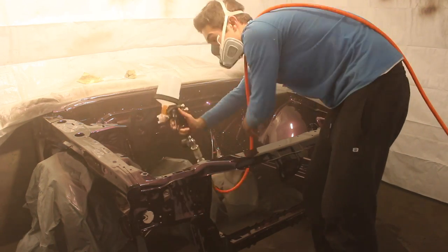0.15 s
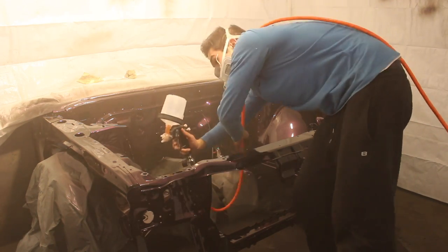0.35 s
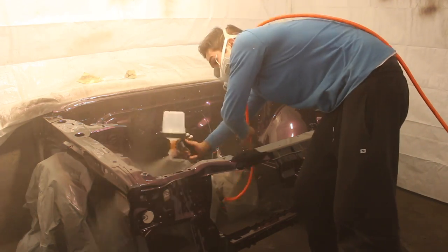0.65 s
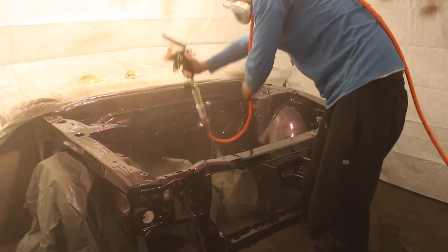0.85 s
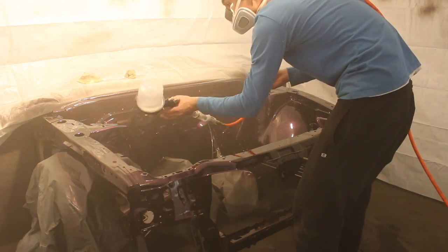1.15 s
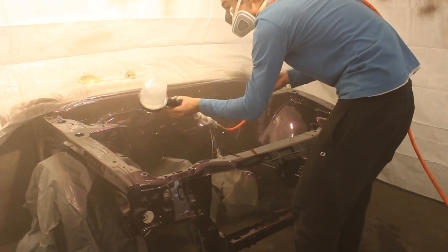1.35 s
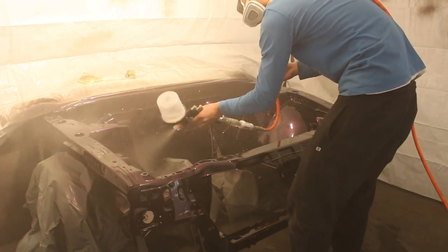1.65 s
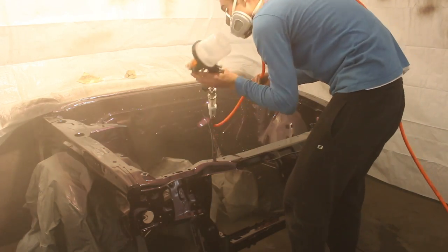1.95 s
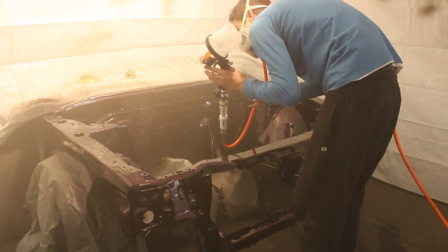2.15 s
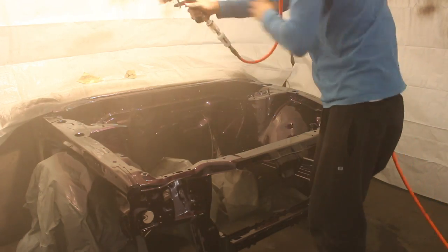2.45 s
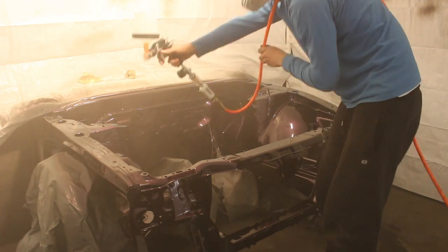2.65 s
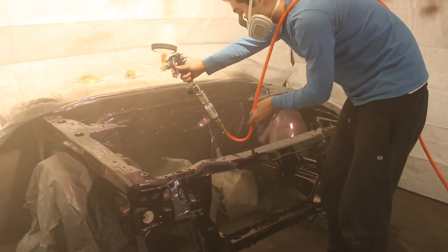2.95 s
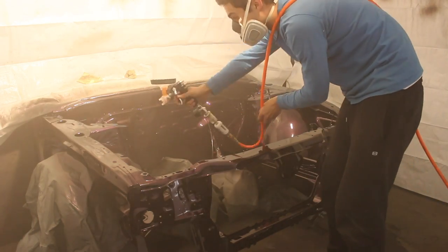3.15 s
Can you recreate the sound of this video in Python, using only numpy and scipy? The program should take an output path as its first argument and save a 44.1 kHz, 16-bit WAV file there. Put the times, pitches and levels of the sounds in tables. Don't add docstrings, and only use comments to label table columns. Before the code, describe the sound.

Paint spray gun hisses in one short and one longer burst over droning extractor fans.

```python
import sys
import numpy as np
from scipy import signal
from scipy.fft import rfft, irfft, next_fast_len
from scipy.io import wavfile
from scipy.ndimage import uniform_filter1d, map_coordinates

SR = 44100
rng = np.random.default_rng(int(sys.argv[2]) if len(sys.argv) > 2 else 0)


def to_linear_factor(level_db):
    exponent = np.asarray(level_db, float) / 20
    return 10 ** exponent


def bounce(signal):
    frames = np.transpose(np.atleast_2d(signal))
    limited = np.clip(frames, -1, 1)
    pcm = np.round(limited * 32767).astype(np.int16)
    wavfile.write(sys.argv[1], SR, pcm)


N = 145530

# frequency in Hz, spectral level in dB.
ROAR_SPECTRUM = [(30, -44), (90, -30), (200, -16.5), (600, -7), (1050, -2), (2500, -4), (6500, -5.5),
                 (9500, -11)]
# centre in Hz, width in Hz, level in dB.
DUCT_MODES = [(119, 9.5, -35.5), (174.6, 20.4, -12), (237, 8.9, -12.5), (386, 42, -13), (447, 22, -3),
              (478.5, 47, -5), (573, 11, -9), (733, 67, -3.5), (803, 48, -5.5), (880, 18, -1.5),
              (1100, 84, -2.5), (1167, 16, 2.5), (1473, 26, -0.5), (1538, 25, -1)]
BLADE_HZ = [289.3, 369.0, 960, 118.4, 221, 5280, 1184]
# list of levels in dB of harmonics 1, 2, .., left-right difference in dB.
BLADE_TONES = [
    ([-63.5, -51.5, -57, -74, -52, -55.5], 0.29),
    ([-62, -54, -53, -56.5, -62, -59], 2),
    ([-49.5], -0.28),
    ([-76.5], -0.8),
    ([-65], 1),
    ([-63.5], -1),
    ([-56], 0),
]
# start in seconds, level in dB.
KNOCKS = [
    (0.599, -64),
    (.76, -46),
    (1.03, -60),
    (1.357, -55),
    (1.76, -54),
    (1.934, -63.5),
]
# time in seconds, level in dB.
LEAK_LEVEL = [(0, -40.5), (.2, -42.5), (.3, -38), (.6, -38.5), (1.0, -40.5), (1.35, -40), (2.0, -38.5),
              (2.45, -38), (2.6, -41.5), (2.8, -39), (3.3, -44)]
# frequency in Hz, spectral level in dB.
LEAK_SPECTRUM = [(2000, -90), (9000, 0.5), (12000, -0.5), (14000, 4), (15200, 12), (17000, -24)]
# start in seconds, length in seconds, air jet in dB,
# delay of the paint in seconds, paint over the air in dB.
PULLS = [
    (0.592, 0.17, -19.5, 0.027, -4.5),
    (1.062, 0.013, -38, .0, 12),
    (1.082, 0.013, -34, .0, 7),
    (1.354, 0.409, -19.5, 0.079, -4),
]
# stored pressure surge in dB, nozzle whistle over the paint in dB,
# broad spit as a share of the paint.
OPENINGS = [
    (-3, -7, .4),
    (0, -30, 0),
    (-2, -30, 0),
    (3, -13, 2.5),
]
# frequency in Hz, spectral level in dB.
AIR_SPECTRUM = [(300, -90), (4000, -19), (6500, -9), (8500, -9), (10500, -6), (13000, 0), (15600, 0.5),
                (21000, -6)]
# frequency in Hz, spectral level in dB.
PAINT_SPECTRUM = [(300, -61), (2400, -9.5), (4300, -7.5), (7000, -1.5), (9000, -1), (13000, 1),
                  (15800, 4.5), (19000, -20)]
# centre in Hz, width in Hz.
WHISTLE_BAND = (3350, 260)
# frequency in Hz, correlation from -1 to 1.
FIELD_COHERENCE = [(40, .5), (130, 1), (640, 0.93), (1400, 0.96), (3100, 0.37), (6800, 0.18), (9500, -0.49),
                   (15000, -0.077)]
# frequency in Hz, correlation from -1 to 1.
GUN_COHERENCE = [(300, .95), (3100, 1), (4500, 0.75), (6800, 0.3), (9500, -0.097), (15000, 0.036)]
# frequency in Hz, left-right difference in dB.
PORT_BALANCE = [(60, -2), (240, 3), (950, 0.0), (3770, -2), (15000, -3)]
# frequency in Hz, weight in dB.
SENSE_WEIGHT = [(1000, -6), (8000, -3), (15500, -1), (20000, 3)]

ROAR_DB, DUCT_DB = -35.5, -47
BOOTH_T60_S, BOOTH_DB = 0.24, -9
KNOCK_HZ, KNOCK_T60_S = 238, 0.083
TICK_S, TICK_DB, TICK_HZ, TICK_LENGTH_S = 1.024, -26.5, 18300, 0.0027
OPEN_S, CLOSE_S, SURGE_S = 0.006, 0.011, 0.006
PAINT_RISE_S, WHISTLE_S, SAG_DB_PER_S = 0.036, 0.12, 1
LOAD_DB = -2.5
HOLD_DB, SENSE_S, RECOVER_DB_PER_S = -32, 0.0058, 63
LAG_S, LAG_HZ = 3e-5, 4660
TOP_HZ = 15760


def unit(x):
    return x / np.sqrt(np.mean(x ** 2) + 1e-20)


def along(points, hz):
    f, v = np.transpose(points)
    return np.interp(np.log(hz + 1), np.log(f + 1), v)


def wobble(rate):
    knots = rng.standard_normal(int(N * rate / SR) + 4)
    return map_coordinates(knots, [np.arange(N) * rate / SR])


def filtered(x, response):
    m = next_fast_len(N + 8192)
    return irfft(rfft(x, m) * response(np.fft.rfftfreq(m, 1 / SR)), m)[..., :N]


def rush(gain, patchy_db, alike=FIELD_COHERENCE):
    z = signal.stft(rng.standard_normal((2, N)), nperseg=512)[2]
    field = uniform_filter1d(rng.standard_normal(z.shape[1:]), size=6, axis=0)
    field = uniform_filter1d(field, size=10, axis=1)
    pair = signal.istft(z * to_linear_factor(patchy_db * unit(field)), nperseg=512)[1][:, :N]

    def mid_side(hz):
        turn = np.arccos(np.clip(along(alike, hz), -1, 1)) / 2
        return gain(hz) * [np.cos(turn), np.sin(turn)]

    mid, side = filtered(pair, mid_side)
    return unit(np.array([mid + side, mid - side]))


def shaped_rush(spectrum, patchy_db, alike=FIELD_COHERENCE):
    return rush(lambda f: to_linear_factor(along(spectrum, f)), patchy_db, alike)


def fan_airflow():
    def duct(f):
        return np.sqrt(sum(to_linear_factor(2 * db) / (1 + (2 * (f - c) / w) ** 2) ** 2 for c, w, db in DUCT_MODES))

    roar = to_linear_factor(ROAR_DB + 0.43 * wobble(9.37)) * shaped_rush(ROAR_SPECTRUM, 0.22)
    return roar + to_linear_factor(DUCT_DB + 1.5 * wobble(14)) * rush(duct, patchy_db=2.5)


def blade_tones():
    t = np.arange(N) / SR
    sides = np.array([[1], [-1]])
    out = np.zeros((2, N))
    for hz, (levels, pan_db) in zip(BLADE_HZ, BLADE_TONES):
        turn = 2 * np.pi * hz * t + 0.23 * wobble(5.086)
        for k, db in enumerate(levels, start=1):
            skew = (rng.normal(0, 0.051) + 0.11 * wobble(6.3)) * sides
            level = np.sqrt(2) * to_linear_factor(db + 1.77 * wobble(6.9) + pan_db / 2 * sides)
            out += level * np.sin(k * turn + 6 * rng.random() + skew)
    return out


def booth(x):
    t = np.arange(SR // 3) / SR
    tail = rng.standard_normal((2, len(t))) * to_linear_factor(-60 * t / BOOTH_T60_S)
    return signal.fftconvolve(x, tail / np.linalg.norm(tail[0]), axes=1)[:, :N]


def knocks():
    t, out = np.arange(SR // 10) / SR, np.zeros(N + SR)
    for start, db in KNOCKS:
        hz = KNOCK_HZ * np.array([[.7], [1.0], [1.3]]) * to_linear_factor(rng.normal(0, 0.94, (3, 1)))
        envelope = to_linear_factor(db - 60 * t / KNOCK_T60_S) * (1 - np.exp(-t / .004))
        out[round(start * SR):][:len(t)] += envelope * np.sin(2 * np.pi * hz * t).sum(0)
    return out[:N]


def leak():
    level_db = np.interp(np.arange(N) / SR, *np.transpose(LEAK_LEVEL))
    return to_linear_factor(level_db + .7 * wobble(12)) * shaped_rush(LEAK_SPECTRUM, .6)


def valve_tick():
    t = np.arange(N) / SR
    return to_linear_factor(TICK_DB) * np.exp(-((t - TICK_S) / TICK_LENGTH_S) ** 2) * np.sin(2 * np.pi * TICK_HZ * t)


def spray():
    t = np.arange(N) / SR
    air, paint, whistle = np.zeros((3, N))
    for (start, length, db, wait, paint_db), (surge_db, whistle_db, spit) in zip(PULLS, OPENINGS):
        u = np.maximum(t - start, 0)
        valve = np.clip(u / OPEN_S, 0, 1) ** 2 * np.clip(1 - (u - length) / CLOSE_S, 0, 1)
        flow = valve * to_linear_factor(db - SAG_DB_PER_S * np.minimum(u, 1))
        loaded = np.clip((u - wait) / PAINT_RISE_S, 0, 1)
        surge = np.exp(-np.maximum(u - OPEN_S, 0) / SURGE_S)
        air += flow * to_linear_factor(LOAD_DB * loaded + surge_db * surge)
        paint += flow * to_linear_factor(paint_db) * (loaded + spit * surge)
        whistle += flow * to_linear_factor(paint_db + whistle_db) * loaded * np.exp(-u / WHISTLE_S)
    centre, width = WHISTLE_BAND
    jet = air * to_linear_factor(.7 * wobble(25)) * shaped_rush(AIR_SPECTRUM, .7, GUN_COHERENCE)
    mist = paint * to_linear_factor(1.4 * wobble(18)) * shaped_rush(PAINT_SPECTRUM, 0.3, GUN_COHERENCE)
    tone = whistle * rush(lambda f: 1 / (1 + (2 * (f - centre) / width) ** 2), 6.5, GUN_COHERENCE)
    return jet + mist + tone


def scene():
    direct = spray()
    background = fan_airflow() + blade_tones() + knocks()
    return direct + to_linear_factor(BOOTH_DB) * booth(direct) + leak() + valve_tick() + background


def low_pass(x):
    return signal.sosfilt(signal.butter(12, 16000, fs=SR, output="sos"), x)


def record(dry):
    half = np.array([[.5], [-.5]])

    def ports(f):
        lag = f / (1 + (f / LAG_HZ) ** 4) * LAG_S
        return to_linear_factor(half * along(PORT_BALANCE, f)) * np.exp(-2j * np.pi * lag * half)

    x = filtered(dry, ports)
    pole = np.exp(-1 / (SENSE_S * SR))
    weighted = filtered(x, lambda f: to_linear_factor(along(SENSE_WEIGHT, f)))
    power = signal.lfilter([1 - pole], [1, -pole], np.mean(weighted ** 2, axis=0))
    need = np.minimum(HOLD_DB - 10 * np.log10(power + 1e-12), 0)
    ramp = RECOVER_DB_PER_S * np.arange(N) / SR
    gain_db = np.minimum.accumulate(need - ramp) + ramp
    mix = filtered(x * to_linear_factor(gain_db), lambda f: f < TOP_HZ)
    return low_pass(mix)


dry = scene()
out = record(dry)
bounce(out)
```